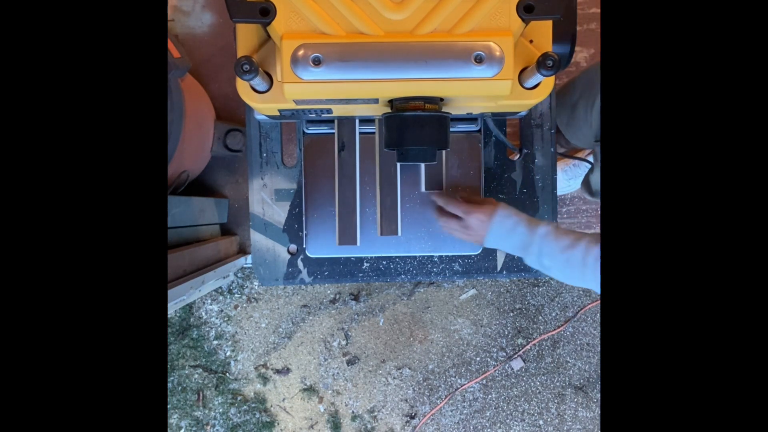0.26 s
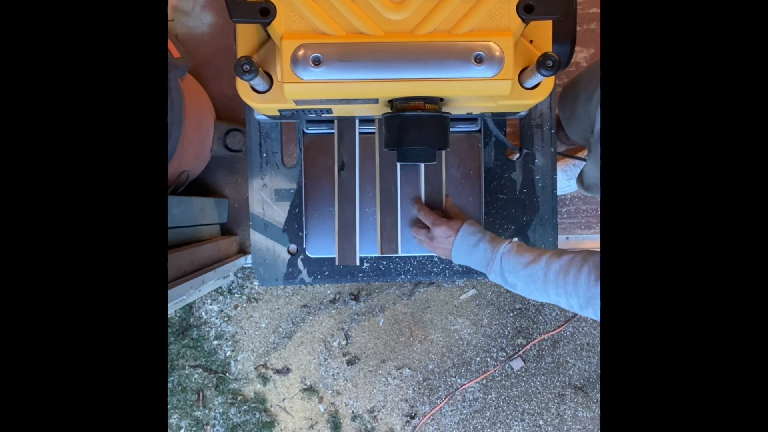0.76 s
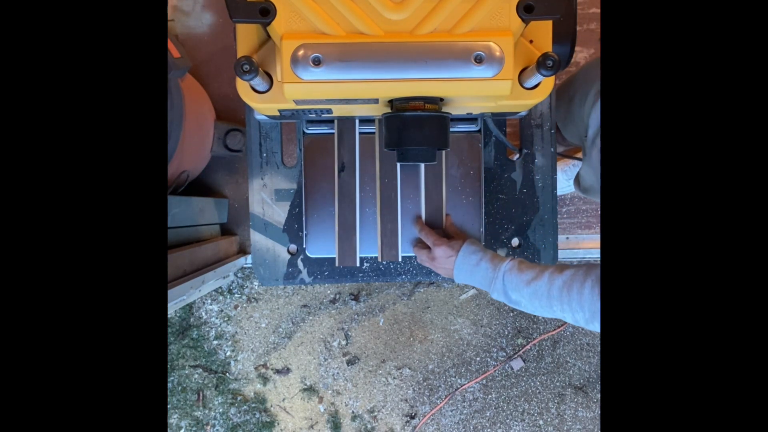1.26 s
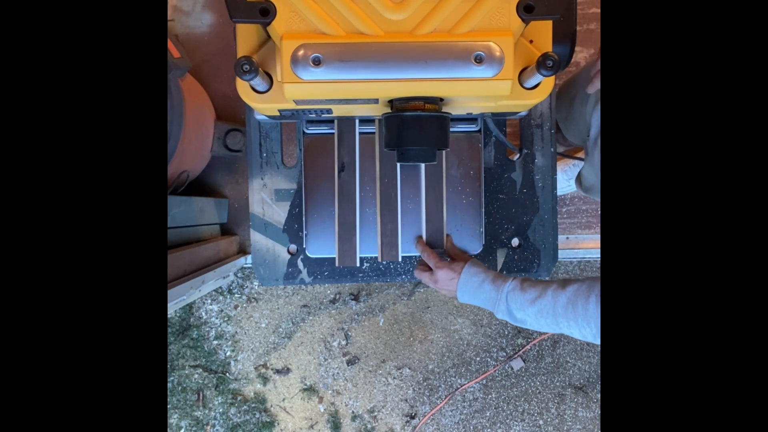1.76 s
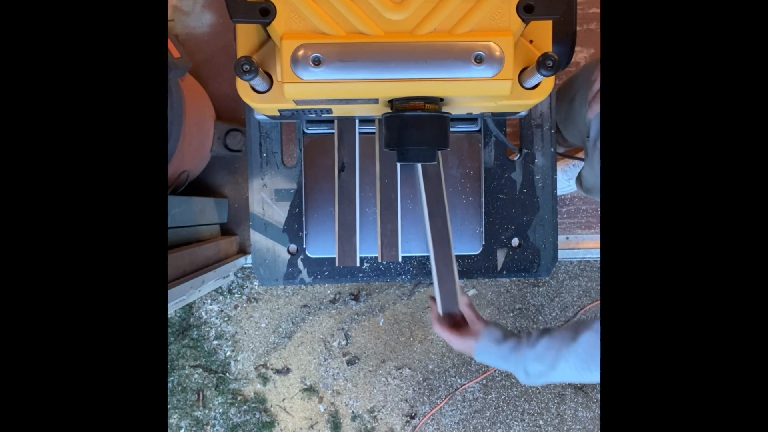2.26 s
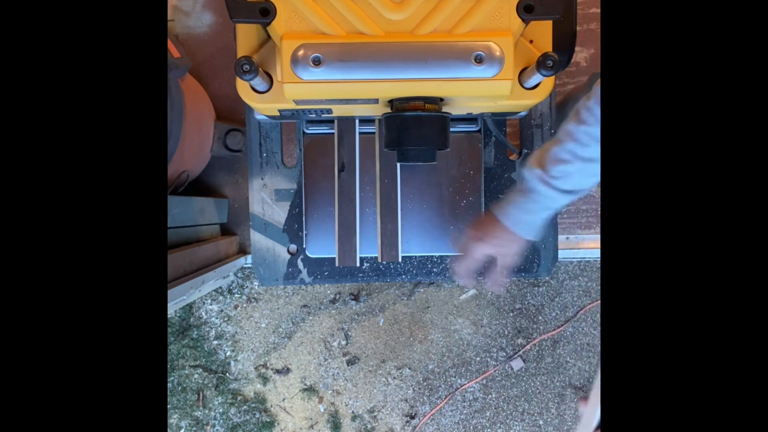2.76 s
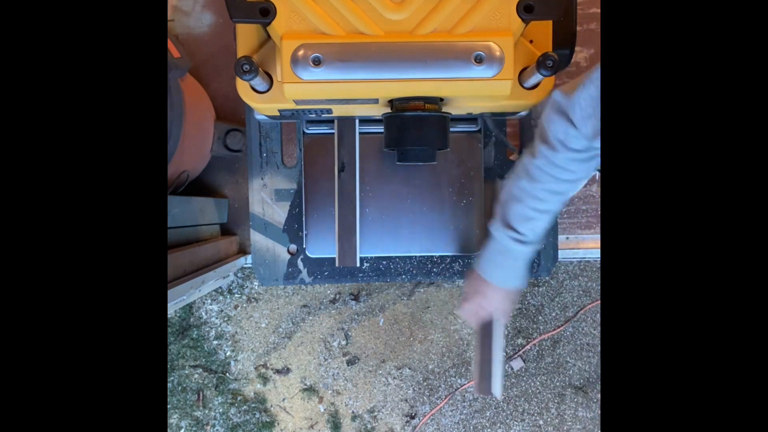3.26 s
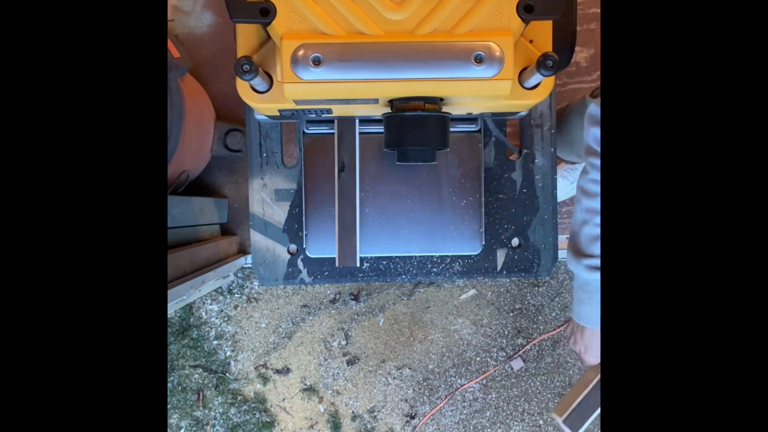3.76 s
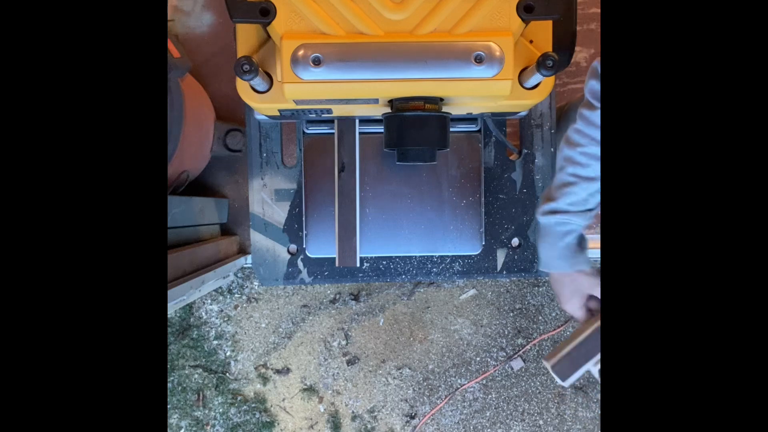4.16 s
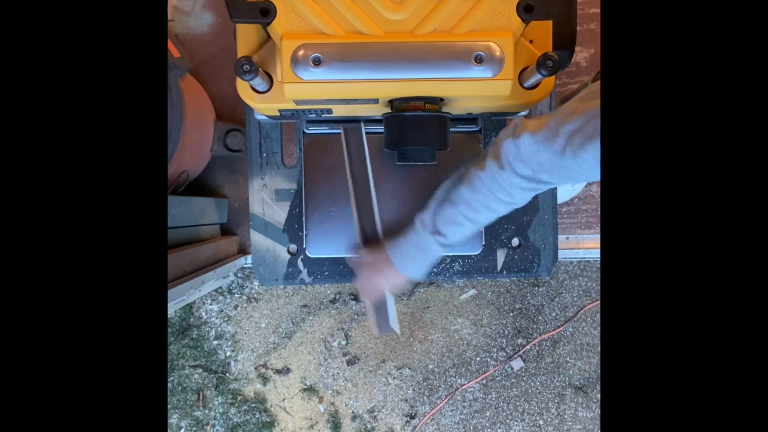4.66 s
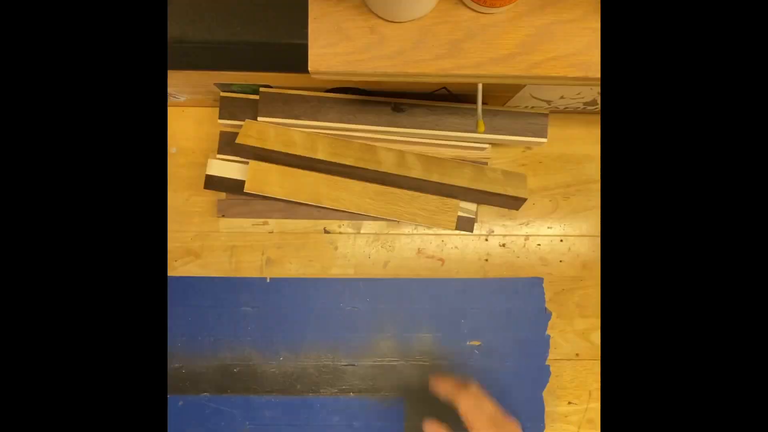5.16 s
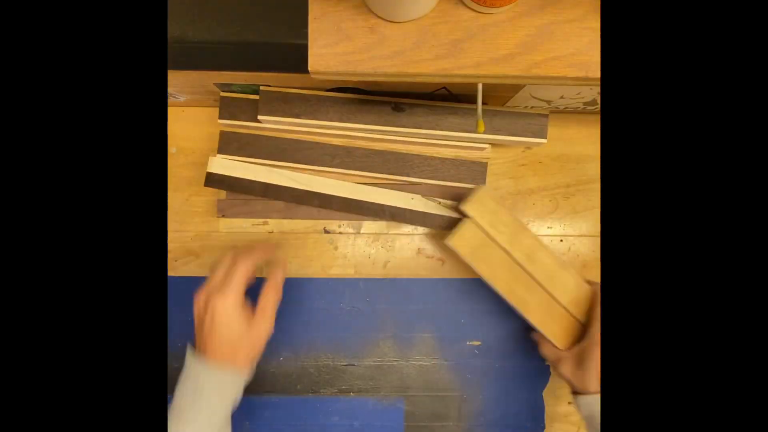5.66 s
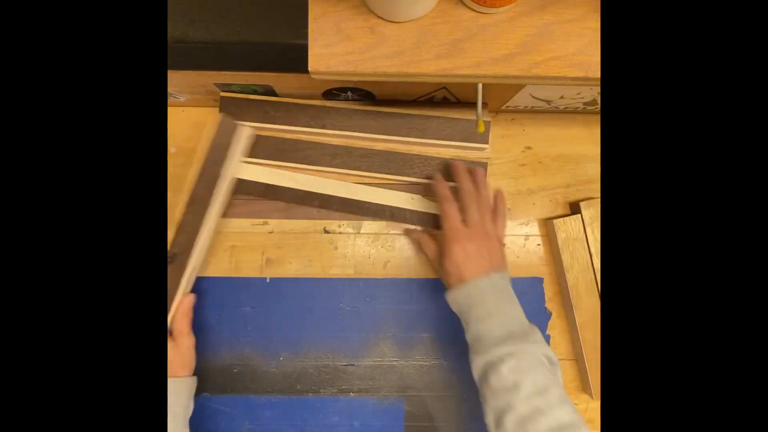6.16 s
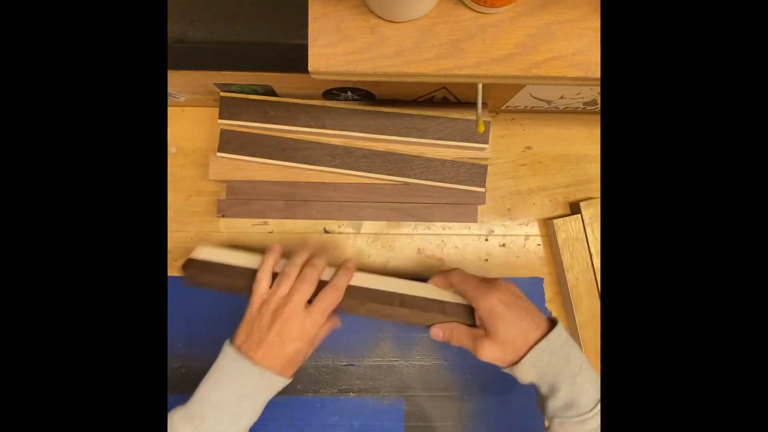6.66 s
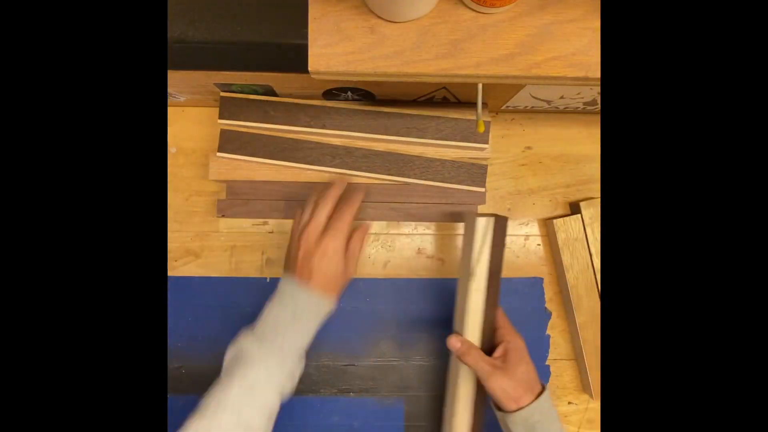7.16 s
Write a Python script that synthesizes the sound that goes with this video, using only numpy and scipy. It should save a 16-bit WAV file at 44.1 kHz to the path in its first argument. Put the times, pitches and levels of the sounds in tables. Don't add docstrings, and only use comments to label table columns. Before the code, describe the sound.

From 0 to about 5.1 s a benchtop planer runs outdoors, near and continuous. A steady buzzing hum near 490 Hz dominates, with weaker multiples, a thin whine around 5.1 kHz, a lower motor tone near 320 Hz and a broad fan roar ringing through the casing. Pitch and level waver only slightly; handling of the strips is not heard separately. At 5.13-5.16 s it fades out abruptly, leaving a tiny gap. From 5.2 s a small workshop opens with low ventilation rumble, faint mains hum and a very faint distant rising whine. Hardwood strips clack hard at 5.45 s, again at 5.7, then a double knock with a short rub around 5.85-5.9. Another knock comes at 6.2, followed by softer taps and a dying slide from 6.35 to 6.55, and a light tap at 6.6. After a lull, a bright, sharp clack and scrape land at 7.3, with small knocks at 7.36 before the end.

```python
import sys
import numpy as np
from scipy import signal
from scipy.fft import rfft, irfft
from scipy.io import wavfile
from scipy.ndimage import uniform_filter1d

SR = 44100
rng = np.random.default_rng(int(sys.argv[2]) if len(sys.argv) > 2 else 0)


def to_wav(sig):
    pcm = np.clip(np.atleast_2d(sig), -1, 1) * 32767
    pcm = np.round(pcm).astype(np.int16)
    wavfile.write(sys.argv[1], SR, pcm.T)


def ratio(d):
    e = np.asarray(d, float) / 20
    return 10 ** e


N = 326781
T = np.arange(N) / SR
F = np.maximum(np.fft.rfftfreq(N, 1 / SR), 1)
MAINS_HZ = 119

# f/Hz, width/Hz, lift/dB
PORT_CAVITIES = [(1740, 740, 3), (4030, 500, 8), (5500, 790, 6), (6970, 470, 4.5), (10600, 870, 5)]


def curves(table):
    s, *columns = np.transpose(table)
    return [np.interp(T, s, column) for column in columns]


def over_hz(points):
    hz, value = np.transpose(points)
    return np.interp(np.log(F), np.log(hz), value)


def resonance_db(hz, width, db, f=F):
    return sum(d / (1 + (2 * (f - h) / w) ** 2) for h, w, d in zip(hz, width, db))


def walk(rate):
    k = int(SR / rate)
    steps = np.repeat(rng.standard_normal(N // k + 1), k)
    return 1.286 * uniform_filter1d(uniform_filter1d(steps, k), k)[:N]


def stereo(mid, side):
    return np.array([mid + side, mid - side])


def tone(hz, db, side_db, turns, flutter_db=1.0, jitter_hz=0.79):
    wavering_hz = hz + jitter_hz * hz / 500 * walk(20)
    phase = 2 * np.pi * np.cumsum(wavering_hz) / SR
    size = np.sqrt(2) * ratio(db + flutter_db * walk(25.08))
    return size * stereo(np.sin(phase), ratio(side_db) * np.sin(phase + 2 * np.pi * turns))


def airflow(mid_db, side_db, rms_db, side_rms_db, flicker_db, tilt_db):
    # f/Hz, share/1
    port_lag = [(500, 0.1), (5000, .2), (8000, 0.6), (11000, .6), (13000, 1)]
    first, second = rfft(rng.standard_normal((2, N)))
    share = over_hz(port_lag)
    mid = first * ratio(mid_db + rms_db) / np.sqrt(np.mean(ratio(2 * mid_db)))
    side = ratio(side_db) * (share * -1j * first + np.sqrt(1 - share ** 2) * second)
    side = side / np.sqrt(np.mean(np.abs(side) ** 2) / N) * ratio(side_rms_db)
    octaves = np.clip(np.log2(F / 60), 0, 8)
    out = 0
    for octave in range(9):
        window = np.clip(1 - np.abs(octaves - octave), 0, 1)
        band = irfft(stereo(mid, side) * window, N)
        out = out + ratio(flicker_db * walk(9) + tilt_db(octave)) * band
    return out


def cutter_head():
    # t/s, knife rate f/Hz, level/dB of the knife tone and of its 2nd, 3rd and 4th multiple
    cutter = [(0.0, 486.5, -23.5, -44, -36.5, -42), (0.24, 486.5, -21.5, -40, -39, -45),
              (0.29, 486.5, -23, -62, -35, -45), (0.3, 486.5, -20, -43, -39.5, -44),
              (0.63, 485.2, -22, -51, -35.5, -48.5), (0.64, 482, -22.5, -50, -36, -44),
              (0.8, 487.3, -20.5, -42.5, -34.5, -52), (0.83, 487.4, -26.5, -65, -40, -64),
              (0.84, 485.7, -20, -41, -33, -52), (0.96, 485.6, -20, -39, -36, -57),
              (0.97, 486.5, -24, -31, -33, -50), (1.01, 481.6, -18, -55, -35.5, -54),
              (1.03, 489, -19.5, -42, -35, -51.5), (1.28, 488.5, -19.5, -37, -36, -40),
              (2.0, 490, -20, -37, -38, -35.5), (2.26, 489.4, -20.5, -43, -39.5, -42),
              (2.81, 489.7, -19.5, -32.5, -38, -41), (2.93, 488, -24, -43, -33, -45),
              (3.0, 490, -24, -32, -33, -41), (3.11, 490.4, -23.5, -40, -36, -43),
              (3.4, 491.3, -22, -37, -35.5, -38.5), (3.57, 490, -22, -37, -34.5, -43),
              (3.58, 494.5, -21.5, -51, -40, -39), (3.64, 490.5, -23.5, -35.5, -34, -41.5),
              (4.36, 489.1, -23, -39.5, -36.5, -36.5), (4.37, 491.3, -23, -57, -40, -42),
              (4.4, 489.6, -21.5, -45, -36, -38.5), (4.6, 490.7, -22.5, -36, -37, -51.5),
              (4.64, 493, -21.5, -45, -40, -41), (4.77, 491.3, -22.5, -32, -42, -44),
              (4.87, 491.6, -24.5, -40, -43, -40), (4.99, 490, -26, -31, -36.5, -42),
              (5.1, 490.7, -26, -41, -42, -39), (5.13, 491.3, -27, -32.5, -44, -45)]
    knife_ports = [
        (-19, 0.5),
        (-7.5, 0.52),
        (-11.5, 0.11),
        (-5, 0.34),
    ]
    knife_hz, *knife_db = curves(cutter)
    knives = sum(tone((k + 1) * knife_hz, knife_db[k], *knife_ports[k]) for k in range(4))
    return knives + tone(knife_hz / 3, -43, -42, .3)


def brush_motor():
    # t/s, commutator f/Hz, level/dB of the commutator, of half its rate, of the fan blades, of the shaft
    motor = [(0.0, 5100, -40, -43.5, -43, -38), (0.2, 5040, -38, -41.5, -39.5, -33.5),
             (0.83, 5067, -36, -41, -37, -36), (0.91, 5090, -44, -40, -43, -34),
             (1.06, 5083, -37, -41, -45, -37), (1.11, 5090, -39, -42, -55, -39),
             (1.27, 5105, -47, -52, -42, -35), (1.58, 5095, -48, -48, -47, -35),
             (1.79, 5094, -41.5, -56, -42.5, -37), (2.34, 5093, -42.5, -46.5, -46, -34),
             (2.56, 5120, -37.5, -47, -40, -37), (2.63, 5120, -40, -46, -49, -35),
             (2.86, 5120, -37.5, -39.5, -39, -36), (2.89, 5080, -53, -39, -61, -37),
             (3.03, 5102, -42, -46, -51, -35.5), (3.53, 5110, -39.5, -46.5, -54, -35.5),
             (4.13, 5106, -42.5, -52, -48, -35.5), (4.17, 5090, -44, -44.5, -64, -38),
             (4.27, 5120, -37, -51, -42, -34), (4.43, 5111, -47, -50.5, -61, -34),
             (4.51, 5104, -41, -51.5, -45, -39.5), (4.76, 5107, -45, -46, -52, -33),
             (4.83, 5097, -41, -52, -42, -36.5), (5.13, 5103, -44.5, -48, -45, -36.5)]
    motor_ports = [
        (-8.5, 0.31),
        (-2.5, 0.19),
        (-15, .2),
        (-24.5, 0.28),
    ]
    bar_hz, *motor_db = curves(motor)
    turn_hz = bar_hz / 16
    orders = (16, 8, 21, 1)
    whine = sum(tone(m * turn_hz, db, *port) for m, db, port in zip(orders, motor_db, motor_ports))
    return whine + tone(MAINS_HZ + 0 * T, -53.5, -31, .3)


def fan_roar():
    # t/s, level/dB, extra level/dB below the top octaves
    roar_course = [(0.0, -35, -1.8), (0.37, -36.5, -0.3), (0.43, -36, -2), (1.13, -36, -1),
                   (2.27, -35.5, -0.7), (2.29, -35.5, -1.2), (3.24, -35, -2.3), (3.29, -34.5, -2.5),
                   (3.41, -35, -1.8), (4.19, -36, -2.1), (4.29, -34.5, -3.7), (4.81, -35, -1.9),
                   (5.07, -35.5, -2), (5.13, -35.5, -2.5)]
    # f/Hz, density level/dB
    roar_mid = [(15, -83), (25, -37), (154, -25.5), (211, -18.5), (313, -11.5), (429, -22.5), (490, -2),
                (573, -18), (1330, -18.5), (1440, -20), (2250, -25), (2930, -24.5), (7370, -23),
                (10400, -31), (13500, -103)]
    # f/Hz, density level/dB
    roar_side = [(15, -84), (25, -59), (91, -68), (322, -16), (433, -15), (482, -2), (552, -10.5),
                 (997, -9), (1570, -12.5), (2560, -7), (5140, -19), (6210, -85), (7910, -23.5),
                 (13200, -23), (15500, -81)]
    # f/Hz, width/Hz, lift in mid/dB, lift in side/dB
    casing = [(260, 56, 5.5, -8), (399, 29, 14, -3), (796, 70, 7, -1), (1030, 100, 10.5, 5),
              (1247, 61, 9, 3), (1630, 100, 2, 4), (1793, 103, 10.5, 2.5), (2040, 100, 11, -0.5),
              (2270, 200, -3, 3), (2407, 45, 6.5, 8), (2532, 28, 13.5, 3), (2904, 100, 11.5, 4.5),
              (3643, 170, 7, -10), (4045, 140, 9, -15), (6070, 180, 7, 6), (6600, 120, 3, 3),
              (7260, 150, 2.5, -6)]
    roar_db, lower_db = curves(roar_course)
    hz, width, mid_lift_db, side_lift_db = np.transpose(casing)
    mid_db = over_hz(roar_mid) + resonance_db(hz, width, mid_lift_db)
    side_db = over_hz(roar_side) + resonance_db(hz, width, side_lift_db)
    roar = airflow(mid_db, side_db, -26, -26.5, 0.7, lambda octave: lower_db * (octave < 6))
    balance_db = [[-.6], [.6]]
    return roar * ratio(roar_db - roar_db[0]) * ratio(balance_db)


def shop_air():
    # t/s, rumble level/dB, hand rustle level/dB
    shop = [(5.2, -52, -62.5), (5.31, -47, -59), (5.54, -44.5, -57), (5.75, -46, -62), (5.88, -43, -46),
            (6.0, -45, -62), (6.22, -50.5, -60), (6.36, -45.5, -55.5), (6.68, -51.5, -59.5),
            (7.03, -48.5, -58), (7.29, -49, -56), (7.41, -52, -55)]
    # f/Hz, density level/dB
    air_mid = [(15, -88), (25, -72), (116, -4.5), (169, -14.5), (253, -12.5), (274, -12.5), (666, -31.5),
               (871, -24.5), (945, -37), (1710, -28.5), (2920, -42), (3930, -42), (9050, -50),
               (10600, -35.5), (15500, -64)]
    # f/Hz, density level/dB
    air_side = [(15, -79), (25, -50), (116, -6), (274, -27.5), (722, -26), (871, -12), (945, -22),
                (2630, -18), (4870, -34), (5430, -28), (7300, -31), (8130, -46.5), (10600, -26.5),
                (12500, -43), (15500, -29)]
    # t/s, f/Hz, level/dB
    far_whine = [(5.2, 791, -67), (5.8, 819, -60), (6.6, 860, -69), (7.0, 874, -64), (7.41, 885, -66)]
    rumble_db, rustle_db = (c - c[int(7 * SR)] for c in curves(shop))
    lift_db = resonance_db(*np.transpose(PORT_CAVITIES)) * 0.49

    def tilt_db(octave):
        return rumble_db if octave < 4 else rustle_db * (octave < 7)

    air = airflow(over_hz(air_mid) + lift_db, over_hz(air_side) + lift_db, -45.5, -55, 1.6, tilt_db)
    hum = tone(MAINS_HZ + 0 * T, -59, -20, .4, flutter_db=2.0)
    return air + hum + tone(*curves(far_whine), -5, .48, flutter_db=4.5, jitter_hz=4.12)


def slides():
    rubs = [
        (5.285, 5.365, -48, -59, -4.5),
        (5.412, 5.464, -42.5, -32.5, -7),
        (5.782, 5.827, -61, -57.5, -10.5),
        (5.848, 5.9, -31, -35.5, -8),
        (5.994, 6.044, -51, -60, -3.5),
        (6.35, 6.534, -36, -62, -9),
        (7.253, 7.319, -59, -44.5, -8.5),
        (7.3, 7.401, -25.5, -43.5, -4),
    ]
    grains = rng.standard_normal((2, N)) * ratio(3.0 * rng.exponential(size=N)) * ratio(3.0 * walk(120))
    grains = rfft(np.array([grains[0], 0.87 * grains[0] + 0.74 * grains[1]]))
    colour_db = resonance_db(*np.transpose(PORT_CAVITIES)) - 12 * np.maximum(np.log2(500 / F), 0)
    out = 0
    for start, end, start_db, end_db, tilt_db in rubs:
        rub = irfft(grains * ratio(colour_db + tilt_db * np.log2(F / 1000)), N)
        rub = rub / np.sqrt(np.mean(rub ** 2))
        edge = np.clip(np.minimum(T - start, end - T) / 0.0067, 0, 1)
        out = out + rub * edge * ratio(np.interp(T, [start, end], [start_db, end_db]))
    return out


def ring(t, hz, t60):
    return np.sin(2 * np.pi * hz * t) * np.exp(-np.log(1000) * t / t60)


def knocks():
    # t/s, peak level/dB, strip mode f/Hz, its t60/s, bench thump level/dB, brightness/dB
    blows = [(5.351, -42.5, 790, 0.048, -6, -17), (5.427, -19.5, 1710, 0.049, -26, -35.5),
             (5.443, -6.5, 1670, 0.032, -17, -34), (5.455, -16.5, 1550, 0.026, -10, -34),
             (5.453, 0.5, 1624, 0.035, -19.5, -10), (5.707, -8, 1880, 0.027, -16.5, -16.5),
             (5.795, -35.5, 754, 0.04, -9, -28), (5.801, -33, 740, 0.095, -4, -26),
             (5.846, -15, 975, 0.025, -14, -36), (5.857, -16, 633, 0.024, -20, -33),
             (5.889, -11.5, 2910, 0.045, -17, -21.5), (5.891, -0.5, 2350, 0.044, -21, -14),
             (5.9, -3.5, 2370, 0.036, -18, -16), (6.02, -39.5, 770, 0.034, -8, -11),
             (6.181, -5.5, 1700, 0.027, -14.5, -15), (6.203, -13.5, 1740, 0.029, -9.5, -24),
             (6.28, -36, 614, 0.036, -2, -25), (6.339, -17.5, 1630, 0.04, -17.5, -16),
             (6.404, -29, 600, 0.031, -7.5, -25), (6.455, -24.5, 1880, 0.028, -13, -27),
             (6.498, -37, 619, 0.055, -12, -21), (6.521, -42, 610, 0.04, -12, -21),
             (6.596, -16, 1760, 0.036, -12, -31), (6.762, -39.5, 800, 0.028, -13, -24),
             (7.258, -35.5, 727, 0.04, -7, -14), (7.297, -22.5, 1300, 0.027, -20, -15),
             (7.313, -0.5, 3460, 0.021, -36, -2.5), (7.322, -21, 3500, 0.04, -17, -17),
             (7.362, -13, 1483, 0.026, -14.5, -25), (7.368, -14.5, 1447, 0.033, -16, -21)]
    # f/Hz, t60/s, level/dB
    bench_modes = [(148, .12, -3), (255.6, 0.073, 1), (399, 0.068, 3), (600, 0.055, -0.5)]
    strip_modes = ((1, -0.5, 0.94), (0.586, -8.5, 0.71), (1.72, -8.5, 0.53))
    size = 16384
    out, t = np.zeros((2, N + size)), np.arange(size) / SR
    f = np.maximum(np.fft.rfftfreq(size, 1 / SR), 1)
    cavity_db = resonance_db(*np.transpose(PORT_CAVITIES), f=f)
    strip_rise = 1 - np.exp(-t / 0.00042)
    bench_rise = 1 - np.exp(-t / 0.0032)
    chance = rng.standard_normal((len(blows), 2, 512))
    for (s, db, hz, t60, thump_db, bright_db), grit in zip(blows, chance):
        grit = np.array([grit[0], 0.44 * grit[0] + 1.6 * grit[1]]) * np.exp(-t[:512] / 0.0039)
        corner_db = [-14, -2, -3, bright_db, bright_db - 15.5]
        colour_db = np.interp(np.log(f), np.log([300, 1200, 3500, 8000, 14000]), corner_db)
        crack = irfft(rfft(grit, size) * ratio(colour_db + cavity_db))
        crack = crack / np.abs(crack).max()
        strip = strip_rise * sum(ratio(d) * ring(t, hz * m, t60 * u) for m, d, u in strip_modes)
        bench = bench_rise * sum(ratio(d) * ring(t, h * (1 + 0.056 * z), u)
                                 for (h, u, d), z in zip(bench_modes, grit[0]))
        strip_pair = np.array([ratio(-1.5) * np.roll(strip, 6), strip])
        at = int(s * SR) - 30
        out[:, at:at + size] += ratio(db) * (ratio(-4) * crack + strip_pair + ratio(thump_db) * bench)
    return out[:, :N]


def room(x):
    t60_s, treble_t60_s, room_db = 0.2, 0.14, -11
    t = np.arange(int(.4 * SR)) / SR
    echoes = rng.standard_normal((2, len(t))) * np.clip(t / 0.0036, 0, 1)
    low = signal.lfilter([.2], [1, -.8], echoes)
    tail = low * ratio(-60 * t / t60_s) + (echoes - low) * ratio(-60 * t / treble_t60_s)
    tail = tail / np.sqrt(np.sum(tail ** 2) / 2)
    return ratio(room_db) * signal.fftconvolve(x, tail, axes=1)[:, :N]


def scene():
    planer = cutter_head() + brush_motor() + fan_roar()
    wood = slides() + knocks()
    workshop = wood + room(wood) + shop_air()
    fade_out = np.interp(T, (5.133, 5.162), [1, 0])
    return planer * fade_out + workshop * (T > 5.2)


def low_pass(x):
    return signal.sosfilt(signal.butter(12, 15680, fs=SR, output="sos"), x)


def record(dry):
    mix = np.tanh(.8 * dry) / 0.79
    return low_pass(mix)


dry = scene()
out = record(dry)
to_wav(out)
```